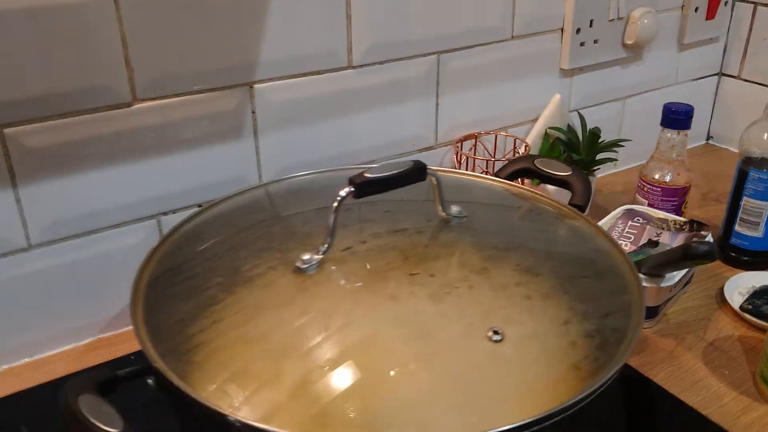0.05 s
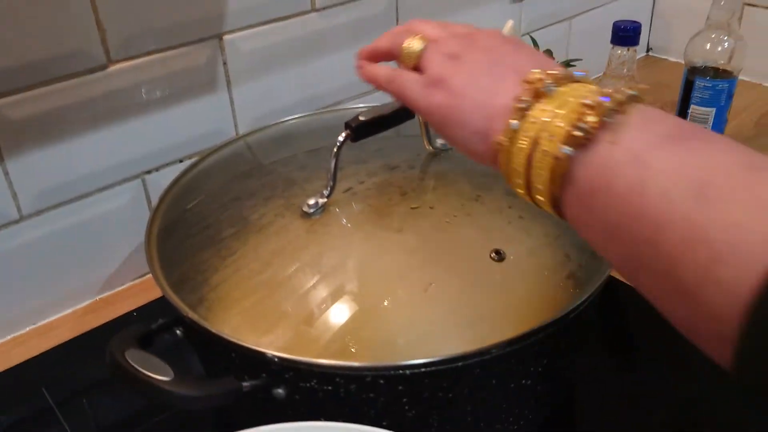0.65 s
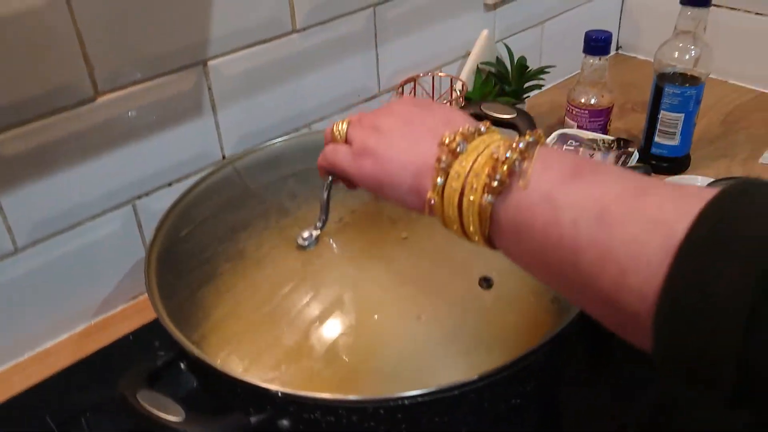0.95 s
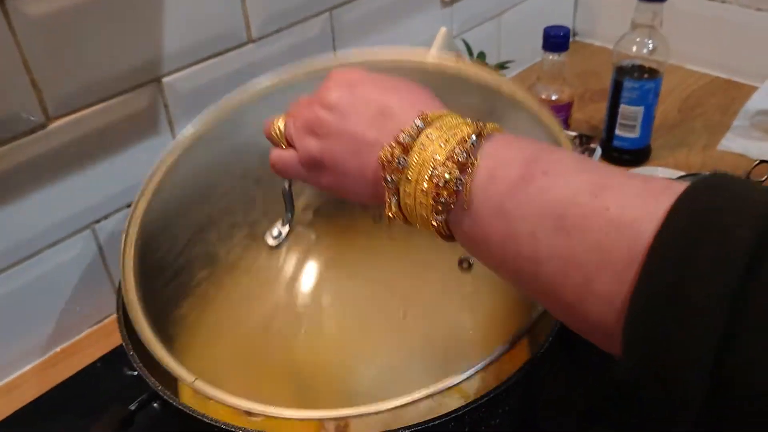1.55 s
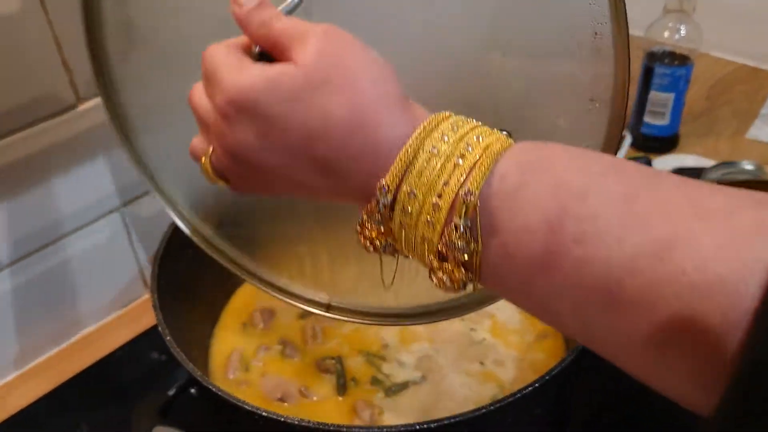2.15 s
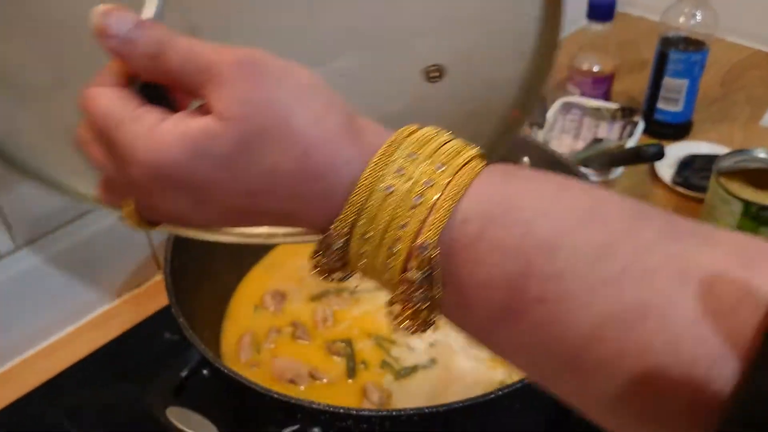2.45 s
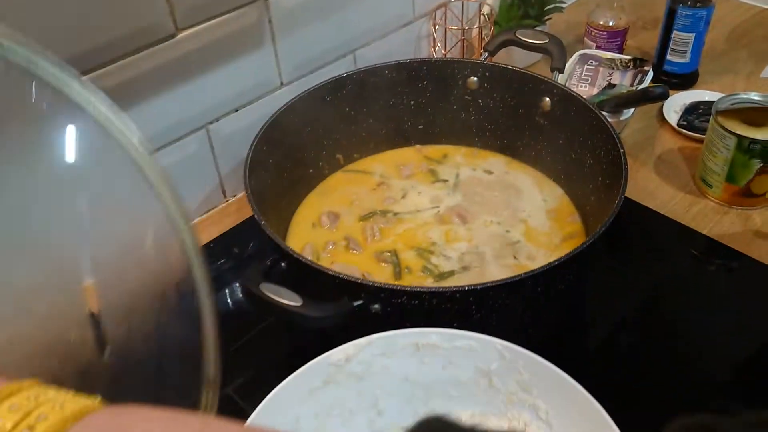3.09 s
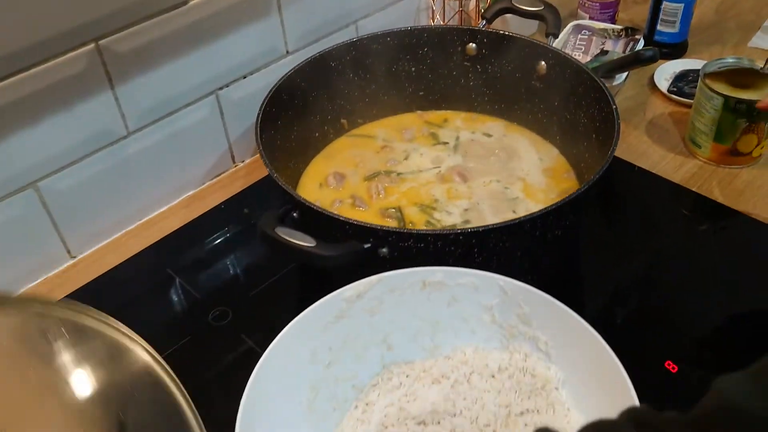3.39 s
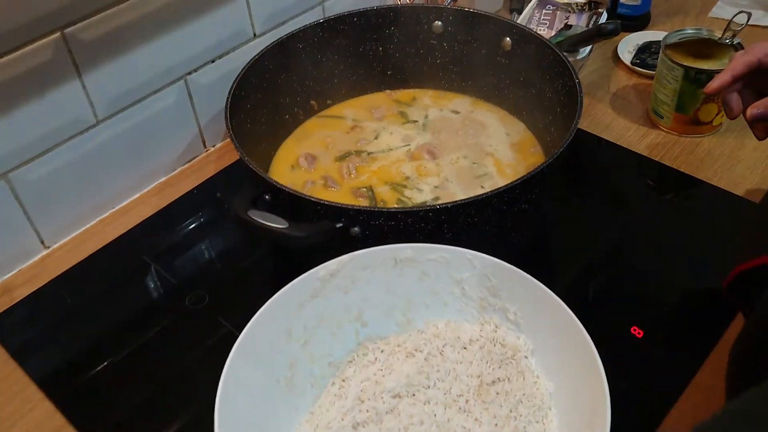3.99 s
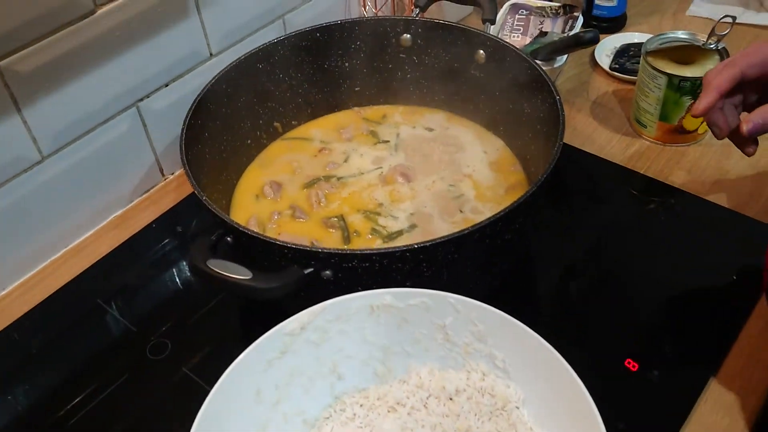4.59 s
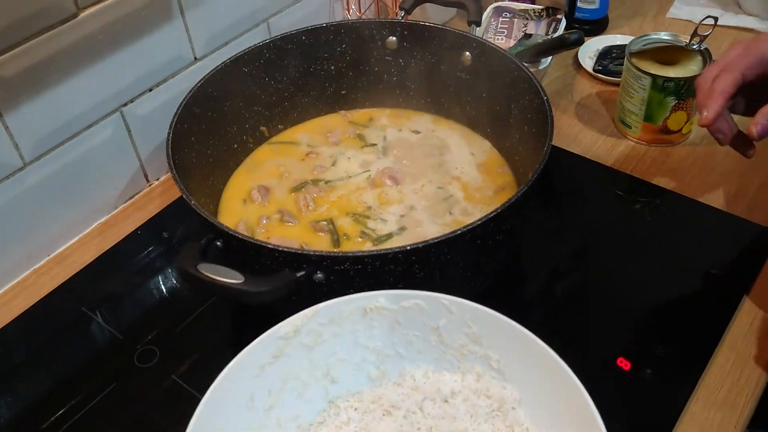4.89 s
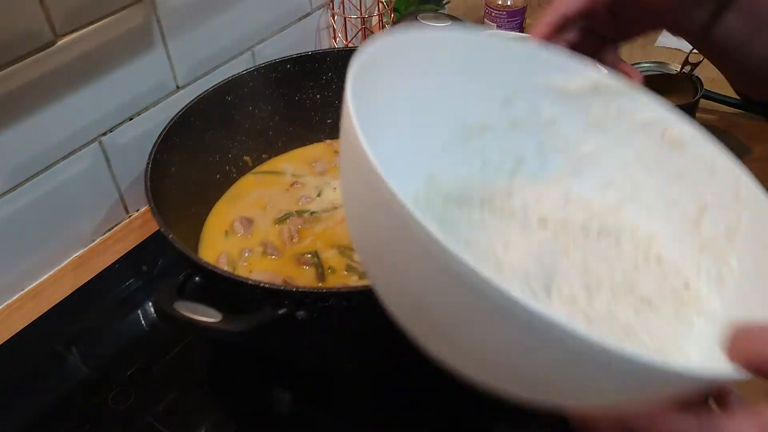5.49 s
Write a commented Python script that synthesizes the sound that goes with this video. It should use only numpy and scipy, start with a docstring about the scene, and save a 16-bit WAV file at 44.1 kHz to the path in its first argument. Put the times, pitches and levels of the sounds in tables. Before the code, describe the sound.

Close to a kitchen hob, faint bubbling and a low hum are broken by a single bright bangle click. Cloth brushes softly as a hand takes the pan's glass lid, and the wet plopping of thick sauce opens up. Later the steel-rimmed lid is put down on the worktop, with a loud thump and a quick ringing rattle that soon dies. The sauce keeps bubbling throughout.

```python
"""Simmering sauce and a glass lid.

Thick sauce plops in a wide pan on a humming electric hob in a tiled kitchen; each bubble pops and gulps.
An arm reaches in (bangle tick, sleeve rustle) and lifts the lid, so the plopping grows louder.
The lid is set on the worktop: one edge knocks, then the rim lands, rings and clatters to rest."""
import sys
import numpy as np
from scipy import signal
from scipy.fft import rfft, irfft, next_fast_len
from scipy.io import wavfile

SR = 44100
rng = np.random.default_rng(int(sys.argv[2]) if len(sys.argv) > 2 else 0)


def to_wav(s):
    """Save 16-bit WAV."""
    ch = np.atleast_2d(s).T  # columns
    pcm = np.round(np.clip(ch, -1, 1) * 32767)  # PCM
    wavfile.write(sys.argv[1], SR, pcm.astype(np.int16))


N = 244358
TIME_S = np.arange(N) / SR

# Table levels are relative within each layer.
# Left-right likeness of diffuse sound: freq_hz, correlation
COHERENCE = [(60, 0.73), (130, 0.78), (290, 0.91), (640, 0.27), (1400, 0), (3000, 0), (15000, 0)]
# Left-right balance of each sound at the microphone, band by band: freq_hz, left_minus_right_db
ROOM_BALANCE = [(60, 2.0), (110, 2.5), (200, 13), (380, 1.5), (700, -3), (1290, -12), (2380, -13),
                (4400, -21), (8120, 12), (15000, 11)]
ARM_BALANCE = [(60, 9), (110, 6.5), (200, 11), (380, 5), (700, -3), (1290, -10.5), (2380, -13), (4400, -18),
               (8120, -19), (15000, -2.5)]
PAN_BALANCE = [(60, 0), (110, -4), (200, 12.5), (380, 0), (700, -0.5), (1290, -7.5), (2380, -13.5),
               (4400, -9), (8120, 2), (15000, -2)]
LID_BALANCE = [(60, 14), (110, -0.5), (200, 3), (380, 2), (700, -1.5), (1290, -8.5), (2380, -4),
               (4400, -11), (8120, -2.5), (15000, 0.5)]
# Room rumble and hiss: freq_hz, level_db
ROOM_SPECTRUM = [(20, 2.5), (50, -2), (70, -6.5), (130, -13.5), (270, -25.5), (600, -20.5), (900, -32.5),
                 (1700, -25.5), (2600, -43), (5200, -46.5), (7000, -55.5), (10000, -59.5), (14500, -57)]
# Hob mains hum: pitch_hz, level_db
HUM_PARTIALS = [(49.4, -51.5), (99.6, -56), (149.5, -66.5)]
# Hand shifting on the microphone: centre_s, level_db, pitch_hz, length_s
HAND_BUMPS = [(0.781, -31.5, 44.2, 0.043), (2.888, -37.5, 48, 0.052), (4.683, -38.5, 108, 0.039),
              (4.714, -27, 31.3, 0.072)]
# Sleeve strokes: peak_s, level_db, attack_s, release_s
SLEEVE_STROKES = [(.008, -54.5, 0.0033, 0.024), (.95, -60, 0.083, .11), (1.111, -52, 0.093, 0.04),
                  (1.195, -54.5, 0.008, 0.14), (1.329, -52, 0.046, 0.057), (2.892, -56.5, 0.07, 0.044),
                  (5.42, -59, 0.079, 0.095)]
# Sliding cloth: freq_hz, level_db
SLEEVE_SPECTRUM = [(500, -17), (900, -5), (1400, -3), (1850, -3), (2200, -10), (2800, -15.5), (4000, -14.5),
                   (5400, -9.5), (6800, -19), (8200, -24), (10000, -29), (14000, -20.5)]
# Bangle contacts: start_s, level_db
BANGLE_TICKS = [(0.5265, -10.5), (2.352, -48), (4.453, -43), (5.237, -51)]
# Bangle resonances: pitch_hz, level_db, t60_s
BANGLE_MODES = [(2230, 0, 0.0029), (3680, 4.5, 0.0011), (7050, -13.5, 0.0036), (8730, -18.5, 0.0081),
                (11800, -15, 0.00079)]
# Big bubbles, film pop and cavity gulp: start_s, pop_db, pop_hz, gulp_db, gulp_hz
BIG_PLOPS = [(1.528, -47.5, 1660, -58, 583), (1.574, -46.5, 1800, -59, 500),
             (1.676, -41, 1300, -43.5, 1250), (1.689, -45.5, 1660, -45, 420),
             (1.794, -49.5, 1370, -43.5, 930), (2.003, -41.5, 1880, -50, 510), (2.029, -45, 1880, -56, 503),
             (2.288, -35.5, 1730, -68, 500), (2.336, -43, 1790, -53, 585), (2.4194, -32, 1674, -57, 500),
             (2.53, -62, 1540, -49, 875), (2.571, -47, 1780, -53, 505), (2.766, -45.5, 1490, -57, 950),
             (2.856, -41.5, 1420, -43, 555), (2.966, -45, 1400, -49.5, 530), (3.11, -52, 2000, -40, 570),
             (3.30, -45, 1770, -46, 850), (3.369, -41.5, 1780, -39.5, 890), (3.532, -70, 1380, -37, 920),
             (3.575, -47.5, 1420, -52, 505), (3.667, -64, 1370, -36.5, 880), (3.704, -40, 1800, -53, 880),
             (3.775, -43.5, 1477, -51, 490), (4.341, -49, 1510, -41.5, 881),
             (4.413, -39.5, 1370, -45.5, 856), (4.583, -35.5, 1410, -39, 565), (4.435, -40, 1760, -49, 615),
             (4.659, -42, 1540, -35.5, 428), (4.856, -44, 1670, -42, 574), (4.934, -63, 1310, -46, 630),
             (5.057, -49, 1320, -45.5, 1010), (5.187, -54, 1400, -43, 890), (5.237, -41.5, 1840, -55, 885),
             (5.287, -38.5, 1670, -45, 510), (5.427, -57, 1360, -36.5, 1040)]
# Bed of small bubbles: freq_hz, gain_db
SIMMER_SPECTRUM = [(130, -13), (200, -19), (262, -1.5), (340, -7.5), (527, -10), (729, -7), (1000, -2.5),
                   (1200, -10), (1770, -18.5), (2420, -15), (3870, -32.5), (6500, -53)]
# Film torn into droplets: freq_hz, level_db
SPRAY_SPECTRUM = [(300, -2.5), (500, 0.5), (1000, -3), (1800, 5), (2300, -8), (3200, -15), (5000, -24.5),
                  (9000, -64)]
# Air and walls of the pan: centre_hz, width_hz, boost_db
PAN_RESONANCES = [(252.6, 53, 13.5), (508, 96, 11.5), (910, 188, 7), (1820, 620, 5.5)]
# Hand takes the lid, lid grazes the worktop: start_s, thud_db, ring_db
LID_TOUCHES = [(1.109, -51.5, -64), (1.191, -41, -45), (1.206, -35, -81), (1.241, -40, -50.5),
               (1.321, -50, -55), (1.378, -38, -91), (3.918, -28.5, -51)]
# Rim on the worktop: start_s, thud_db, ring_db, crack_db
LID_KNOCKS = [(3.977, -10, -25, -26.5), (3.9853, -40, -19.5, -55), (4.0374, -7, -20.5, -19.5),
              (4.0486, -18.5, -15.5, -37), (4.0573, -24, -44, -35), (4.064, -20, -34, -32.5),
              (4.072, -8.5, -25, -35), (4.0809, -20, -32, -36), (4.089, -16, -25, -47),
              (4.099, -46, -37, -61), (4.138, -33, -52, -70)]
# Low tones of the lid knocking on the worktop: pitch_hz, level_db, t60_s
LOW_TONES = [(141.3, -11.5, 0.38), (222.5, 3.5, .13), (252.2, -5.5, 0.26), (284.7, 1.5, 0.13),
             (385.6, -6, 0.26), (443, -12.5, 0.3), (492, -5.5, 0.11), (532.5, -19, 0.36), (701, -25, 0.26)]
# Glass and steel rim resonances: pitch_hz, level_db, t60_s
RIM_MODES = [(950, -9.5, 0.073), (1134, -11.5, 0.12), (1364, -0.5, 0.16), (1440, -10.5, 0.15),
             (1550, -1, 0.28), (1649, 0, 0.12), (1731, 3, 0.14), (1940, -1.5, 0.12), (2177, -17, 0.2),
             (2423, -5.5, 0.067), (2713, -8.5, .08), (3690, -14, .05), (4080, -12, .06),
             (4430, -11.5, 0.068), (5205, -4.5, 0.041), (5740, -17, .06)]
# Ring choked as the rim comes to lie flat: time_s, gain_db
LID_CHOKE = [(4.168, 1), (4.182, -10), (4.5, -4), (4.6, -2.5)]
# Dull worktop thump: freq_hz, level_db
THUD_SPECTRUM = [(50, -4.5), (100, -3), (160, 8.5), (230, -17), (300, 0.5), (500, -9), (700, -17),
                 (1100, -22), (2000, -62)]
# Steel edge scuffing wood: freq_hz, level_db
CRACK_SPECTRUM = [(400, 7), (800, -18), (1500, 14), (2700, 10.5), (3200, -7.5), (4300, 6), (5300, 5.5),
                  (6500, -4), (9000, -4.5), (10000, -14), (11500, -10.5), (15500, -13)]


def from_db(db):
    """Decibels to gain."""
    return 10 ** (np.asarray(db) / 20)


def unit_rms(x):
    """Scale to rms 1."""
    return x / np.sqrt(np.mean(x ** 2) + 1e-20)


def at_bins(table, size):
    """Read a table at the FFT bins, on a log-frequency axis."""
    hz, values = np.transpose(table)
    return np.interp(np.log(np.fft.rfftfreq(size, 1 / SR) + 1), np.log(hz), values)


def drift(rate_hz, times_s=TIME_S):
    """Random wander between unit-normal knots."""
    knots = rng.standard_normal(600)
    return np.interp(times_s * rate_hz, np.arange(len(knots)), knots)


def lowpass(x, hz, order=2):
    """Take the treble off."""
    return signal.sosfilt(signal.butter(order, hz, fs=SR, output="sos"), x + 1e-18)


def highpass(x, hz, order=2):
    """Take the bass off: a small body radiates long waves poorly."""
    return signal.sosfilt(signal.butter(order, hz, "high", fs=SR, output="sos"), x + 1e-18)


def colour(x, spectrum):
    """Shape a steady sound by a spectrum; rms 1."""
    size = next_fast_len(N, True)
    gain = from_db(at_bins(spectrum, size))
    return unit_rms(irfft(rfft(x, size) * gain, size)[..., :N])


def balance(x, table):
    """Share between left and right, band by band, at constant power."""
    size = next_fast_len(N, True)
    lean_db = at_bins(table, size) / 2
    gain = from_db([lean_db, -lean_db])
    gain /= np.sqrt(np.mean(gain ** 2, axis=0))
    return irfft(rfft(x, size) * gain, size)[:, :N]


def diffuse(size=N):
    """White stereo noise, alike in the bass, unrelated in the treble."""
    padded = next_fast_len(size, True)
    mid, side = rfft(rng.standard_normal((2, padded)))
    alike = at_bins(COHERENCE, padded)
    mid, side = mid * np.sqrt(1 + alike), side * np.sqrt(1 - alike)
    return unit_rms(irfft([mid + side, mid - side], padded)[:, :size])


def echoes(x, t60_s, gap_s):
    """Dense reflections decaying after a gap; unit-energy response."""
    t = TIME_S[:SR // 2]
    onset = np.clip(t / gap_s - 1, 0, 1)
    response = unit_rms(diffuse(len(t)) * from_db(-60 * t / t60_s) * onset) / np.sqrt(len(t))
    return signal.fftconvolve(np.atleast_2d(x), response, axes=-1)[:, :N]


def clicks(times_s, levels_db):
    """One impulse per contact."""
    out = np.zeros(N)
    out[np.round(times_s * SR).astype(int)] = from_db(levels_db)
    return out


def ring(force, hz, t60_s):
    """Each click starts a decaying sine."""
    radius, angle = from_db(-60 / (t60_s * SR)), 2 * np.pi * hz / SR
    return signal.lfilter([0, np.sin(angle)], [1, -2 * radius * np.cos(angle), radius ** 2], force + 1e-18)


def decay(force, t60_s):
    """Envelope that jumps at each click and dies away."""
    return signal.lfilter([1], [1, -from_db(-60 / (t60_s * SR))], force + 1e-18)


def room_air():
    """Steady kitchen rumble and hiss."""
    return balance(from_db(-49.5) * colour(diffuse(), ROOM_SPECTRUM), ROOM_BALANCE)


def hob():
    """Mains hum, wavering in level and phase."""
    hum = np.zeros(N)
    for hz, db in HUM_PARTIALS:
        amplitude = np.sqrt(2) * from_db(db + 2 * drift(1.99))
        hum += amplitude * np.sin(2 * np.pi * hz * TIME_S + 0.33 * drift(2.7))
    return balance(hum, ROOM_BALANCE)


def handling():
    """Soft, low thumps through the microphone body."""
    thumps = np.zeros(N)
    for centre_s, db, hz, length_s in HAND_BUMPS:
        t = TIME_S - centre_s
        thumps += from_db(db) * np.exp(-(2 * t / length_s) ** 2) * np.sin(2 * np.pi * hz * t)
    return thumps


def sleeve(rest_db=-72, flicker_db=2.66):
    """Cloth slides with each arm stroke and never lies quite still."""
    power = from_db(rest_db) ** 2
    for peak_s, db, attack_s, release_s in SLEEVE_STROKES:
        width_s = np.where(TIME_S < peak_s, attack_s, release_s)
        power += from_db(db) ** 2 * np.exp(-2 * abs((TIME_S - peak_s) / width_s) ** 1.28)
    envelope = np.sqrt(power) * from_db(flicker_db * drift(60))
    return balance(colour(diffuse(), SLEEVE_SPECTRUM) * envelope, ARM_BALANCE)


def bangles():
    """Bangles knock and ring briefly, close on the right."""
    force = clicks(*np.transpose(BANGLE_TICKS))
    modes = sum(from_db(db) * ring(force, hz, t60_s) for hz, db, t60_s in BANGLE_MODES)
    tick = highpass(modes, 1100, order=1)
    direct = from_db([[-30], [1]]) * tick
    reflected = from_db([[-22], [-14]]) * echoes(tick, t60_s=0.15, gap_s=0.00019)
    return reflected - direct


def grip(start_s=0.91, end_s=1.14, fade_s=0.033, centre_hz=1860, width_hz=190):
    """Fingers slide on the lid handle: a narrow, grainy scrape."""
    band = signal.iirpeak(centre_hz, centre_hz / width_hz, fs=SR)
    friction = unit_rms(signal.lfilter(*band, diffuse()))
    pressure = np.clip(np.minimum(TIME_S - start_s, end_s - TIME_S) / fade_s, 0, 1)
    return balance(friction * from_db(-60.5 + 1.6 * drift(45.1)) * pressure, ARM_BALANCE)


def lid_loss_db(times_s, closed_db=11, lift_s=1.05, length_s=1.71):
    """The pan grows louder as the lid clears it."""
    return closed_db * (1 - np.clip((times_s - lift_s) / length_s, 0, 1))


def bubbles(times_s, levels_db, pitches_hz, t60_cycles, rise):
    """Each bubble opens within a cycle or two and rings out, rising in pitch."""
    out = np.zeros(N + SR)
    for start_s, db, hz in zip(times_s, levels_db, pitches_hz):
        cycles = TIME_S[:int(t60_cycles / hz * SR) + 1] * hz
        age = cycles / t60_cycles
        envelope = (1 - np.exp(-cycles ** 2)) * from_db(db - 60 * age)
        start = int(start_s * SR)
        out[start:start + len(age)] += envelope * np.sin(2 * np.pi * cycles * (1 + rise * age))
    return out[:N]


def simmer(count=2000, swell_db=3.5):
    """Bed of small bubbles, swelling at random, quieter under the lid."""
    when, size, pitch = rng.random((count, 3)).T
    small = bubbles(when * TIME_S[-1], 12 * size, 230 * 16 ** pitch, t60_cycles=8.3, rise=0.034)
    gain = from_db(-67 + swell_db * drift(5.047) - lid_loss_db(TIME_S))
    return colour(np.diff(small, prepend=0), SIMMER_SPECTRUM) * gain


def spray(bursts, drops_per_s=2500):
    """Each burst tears the film into droplets."""
    droplets = rng.standard_normal(N) * (rng.random(N) < drops_per_s / SR)
    return from_db(-16) * colour(droplets, SPRAY_SPECTRUM) * decay(lowpass(bursts, 200), t60_s=0.09)


def lesser_plops(count=120, rate_hz=11, mean_db=-52, spread_db=3):
    """One random bubble per time slot; columns as BIG_PLOPS."""
    when, pop_pitch, gulp_pitch = rng.random((count, 3)).T
    start_s = (np.arange(count) + when) / rate_hz
    pop_db, gulp_db = rng.normal(mean_db, spread_db, (count, 2)).T - lid_loss_db(start_s)
    pop_hz = np.interp(pop_pitch, [0, 1], [1245, 1853])
    gulp_hz = np.interp(gulp_pitch, [0, 1], [442, 1010])
    return np.transpose([start_s, pop_db, pop_hz, gulp_db, gulp_hz])[start_s < TIME_S[-1]]


def splutter(times_s, levels_db, pitches_hz, t60_cycles, span_s, scatter, after_db, count=5):
    """A bursting bubble sets off a few weaker ones."""
    delay, detune = np.transpose(rng.random((len(times_s), count, 2)), (2, 0, 1))
    trail_s = times_s[:, None] + span_s * (np.arange(count) + delay) / count
    trail_db = levels_db[:, None] + after_db - 9 * np.arange(count) / count
    trail_hz = pitches_hz[:, None] * np.exp(scatter * (2 * detune - 1))
    trail = bubbles(trail_s.ravel(), trail_db.ravel(), trail_hz.ravel(), t60_cycles, rise=0.024)
    return bubbles(times_s, levels_db, pitches_hz, t60_cycles, rise=0.013) + trail


def pan(x):
    """The pan's resonances colour every bubble alike; its walls add echoes."""
    for hz, width_hz, boost_db in PAN_RESONANCES:
        band = signal.lfilter(*signal.iirpeak(hz, hz / width_hz, fs=SR), x)
        x = x + (from_db(boost_db) - 1) * band
    early = echoes(x, t60_s=0.035, gap_s=0.0012)
    late = echoes(x, t60_s=0.092, gap_s=0.013)
    return from_db(-2.5) * x + early + from_db(-9) * late


def sauce():
    """Films pop and cavities gulp, with a little spray, over the simmer."""
    start_s, pop_db, pop_hz, gulp_db, gulp_hz = np.vstack([BIG_PLOPS, lesser_plops()]).T
    pops = splutter(start_s, pop_db + 1, pop_hz,
                    t60_cycles=20.4, span_s=0.027, scatter=0.2, after_db=-6)
    gulps = splutter(start_s, gulp_db + 6.5, gulp_hz,
                     t60_cycles=6.56, span_s=0.021, scatter=0.47, after_db=-3)
    plops = lowpass(highpass(pops + gulps, 457), 4050, order=4)
    bursts = clicks(start_s, pop_db) + clicks(start_s, gulp_db - 2.5)
    return balance(pan(plops + spray(bursts) + simmer()), PAN_BALANCE)


def lid_ring(tones, force, spread_db, split):
    """The round lid rings in close pairs of tones, struck with varying strength, choked as it lies flat."""
    out, active = np.zeros(N), np.flatnonzero(abs(force) > 1e-9)
    for hz, db, t60_s in tones:
        drive = np.zeros(N)
        drive[active] = force[active] * from_db(db + spread_db * drift(36, TIME_S[active]))
        out += (ring(drive, hz * (1 - split), t60_s) + ring(drive, hz * (1 + split), t60_s)) / 2
    return out * from_db(np.interp(TIME_S, *np.transpose(LID_CHOKE)))


def lid():
    """Contacts ring the glass, thump the worktop and scuff it with a short crack."""
    knock_s, thud_db, ring_db, crack_db = np.transpose(LID_KNOCKS)
    touch_s, touch_thud_db, touch_ring_db = np.transpose(LID_TOUCHES)
    touch = lowpass(clicks(touch_s, touch_thud_db), 206)
    weight = clicks(knock_s, thud_db) + touch
    low_force = highpass(lowpass(weight, 517), 217)
    low = from_db(-6.5) * lid_ring(LOW_TONES, low_force, spread_db=5.5, split=0.00088)
    rim_force = clicks(knock_s, ring_db) + lowpass(clicks(touch_s, touch_ring_db), 3600)
    rim = from_db(-5.5) * lid_ring(RIM_MODES, rim_force, spread_db=3.5, split=0.0049)
    thud_force = from_db(-14) * lowpass(weight, 440) + from_db(-9.5) * touch
    thud = colour(diffuse(), THUD_SPECTRUM) * decay(thud_force, t60_s=0.15)
    scuff = lowpass(clicks(knock_s, crack_db), 340)
    crack_envelope = from_db(1) * decay(scuff, t60_s=0.016) + from_db(-4) * decay(scuff, t60_s=0.17)
    crack = colour(diffuse(), CRACK_SPECTRUM) * crack_envelope
    # Low tones hang in the room; the glass is heard mostly off nearby tiles.
    room = from_db(-23.5) * echoes(low, t60_s=0.89, gap_s=0.025)
    tiles = from_db(-1) * echoes(rim, t60_s=0.14, gap_s=0.00062)
    return balance(from_db(-6) * rim - low + thud + crack + room + tiles, LID_BALANCE)


def scene():
    """Stereo mix at the hob."""
    return sauce() + lid() + grip() + bangles() + sleeve() + handling() + hob() + room_air()


def record(dry):
    """Round the peaks, cut the top."""
    ceiling, stopband_hz = 0.85, 16800
    top_cut = signal.cheby2(16, 70, stopband_hz, fs=SR, output="sos")
    return signal.sosfilt(top_cut, ceiling * np.tanh(dry / ceiling))


dry = scene()
out = record(dry)
to_wav(out)
```